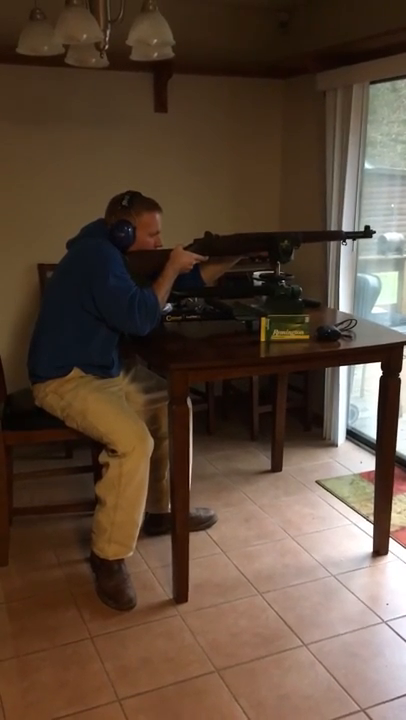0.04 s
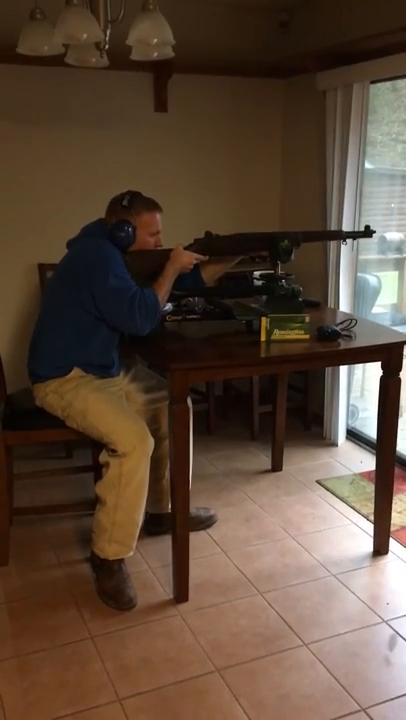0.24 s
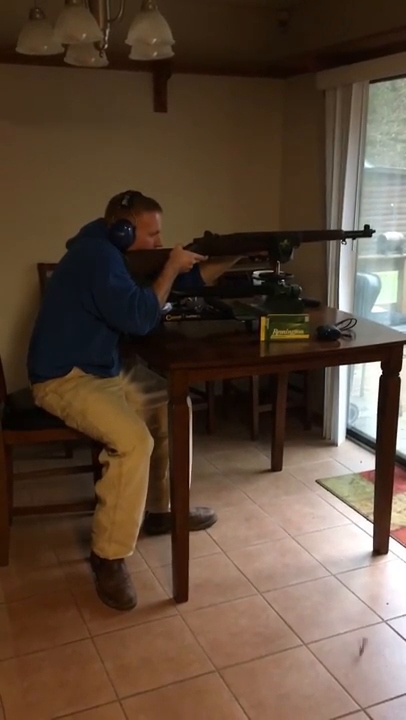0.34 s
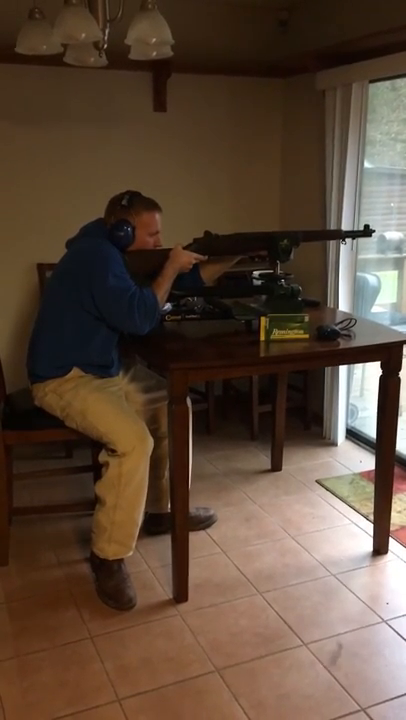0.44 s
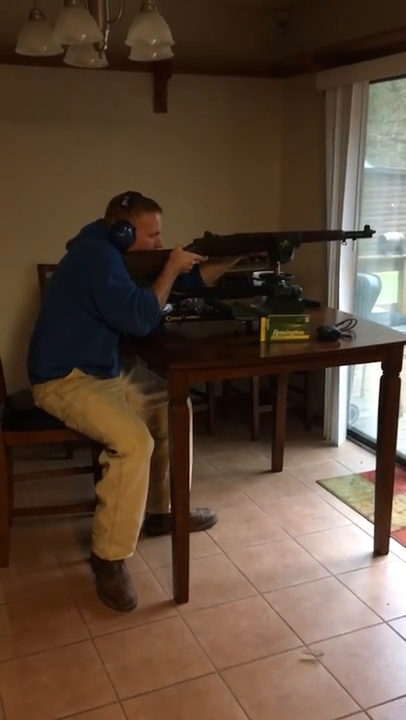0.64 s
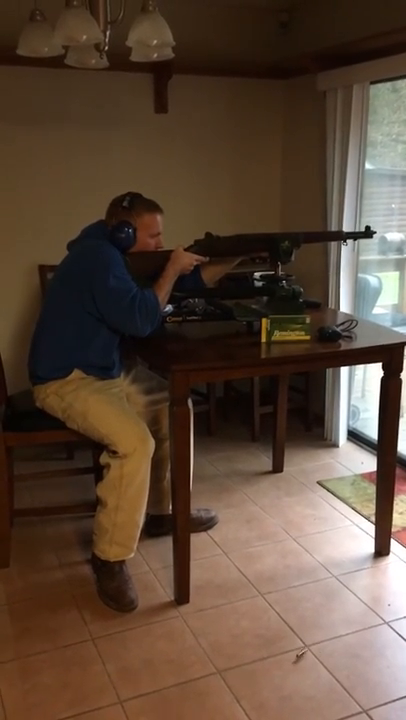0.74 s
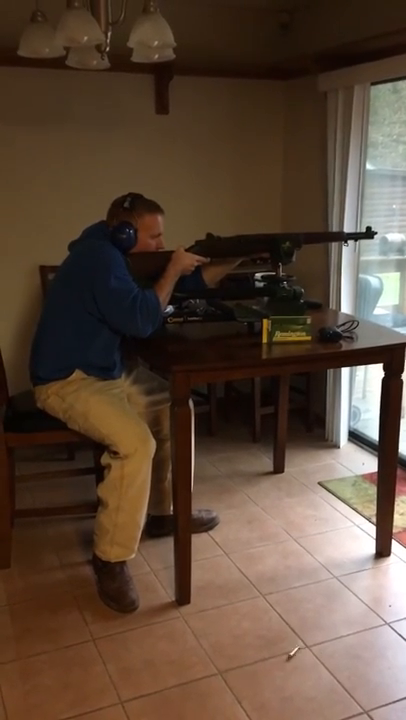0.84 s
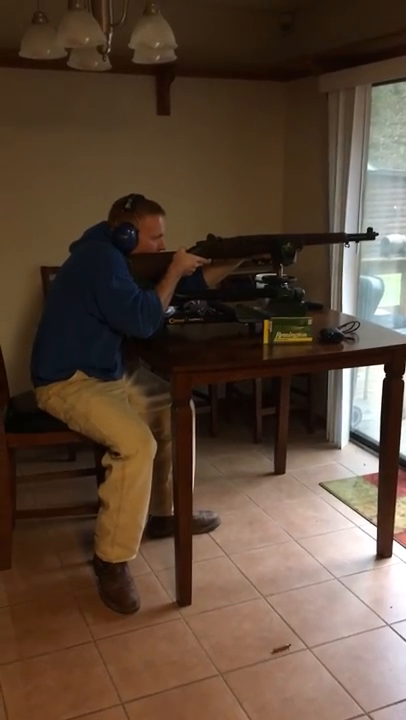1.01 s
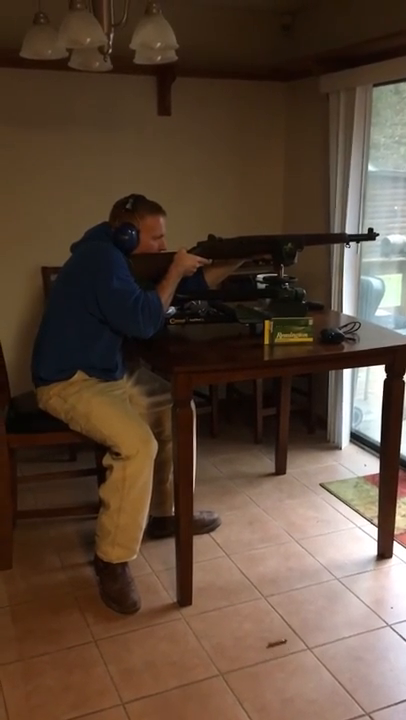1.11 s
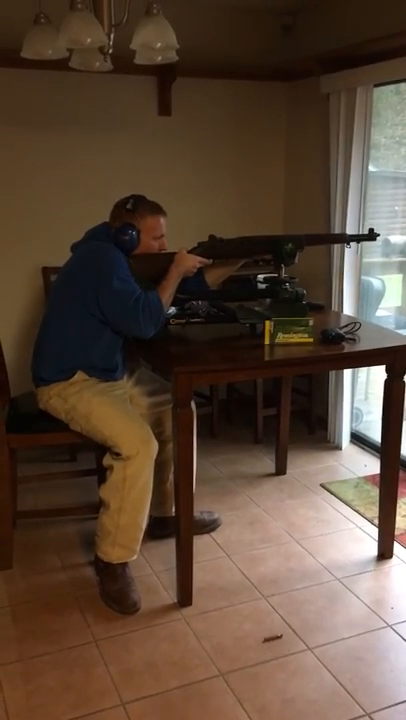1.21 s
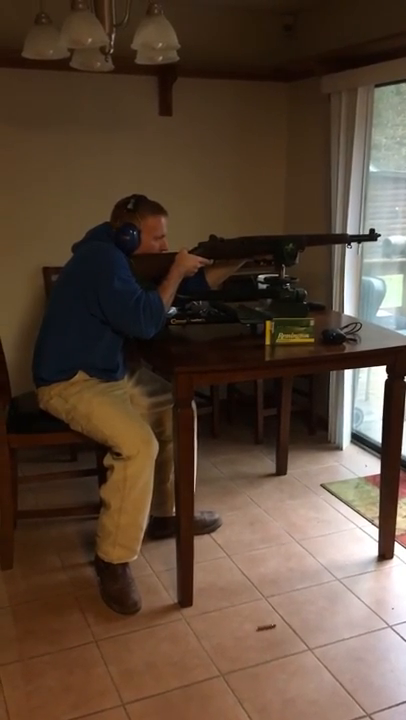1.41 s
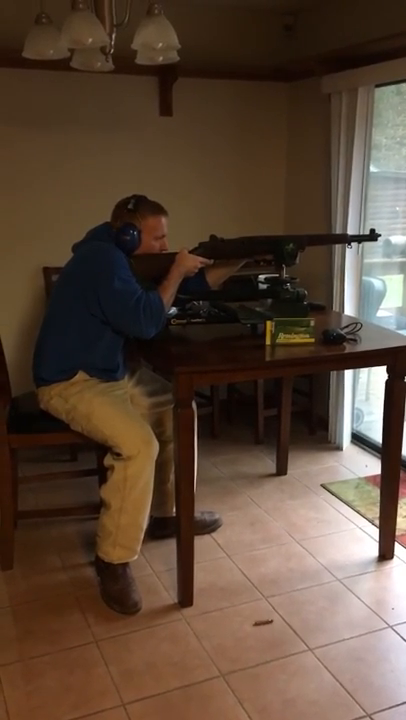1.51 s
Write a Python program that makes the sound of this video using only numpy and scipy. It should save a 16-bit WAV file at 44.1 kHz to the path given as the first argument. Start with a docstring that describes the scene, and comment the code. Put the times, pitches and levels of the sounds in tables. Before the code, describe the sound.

An empty brass shell casing drops on tile, clinking, bouncing and rattling to rest indoors.

```python
"""Cartridge case dropped on tile

A spent brass case lands on a tile floor, tumbles through ever shorter bounces, rattles and rolls.
Each contact gives a dull knock, a bright tick and a high, beating ring of the case's thin wall.
A hard-walled dining room answers, over low background noise, hum and a few soft bumps."""
import sys
import numpy as np
from scipy import signal
from scipy.fft import rfft, irfft, next_fast_len
from scipy.io import wavfile

SR = 44100
rng = np.random.default_rng(int(sys.argv[2]) if len(sys.argv) > 2 else 0)


def wrap_up_sound(samples):
    """Save the sound to the file named by the first command line argument, as 16-bit audio."""
    columns = np.atleast_2d(samples).T
    # keep every value between -1 and 1, then stretch to whole-number steps
    tamed = np.clip(columns, -1, 1)
    steps = np.round(tamed * 32767).astype(np.int16)
    wavfile.write(sys.argv[1], SR, steps)


N = 68355
TOP_HZ = 16000

# Contacts with the tile. Each row: start in seconds, knock in dB, knock cutoff in Hz, tick in dB,
# room send in dB, ring in dB, ring T60 in seconds, spin flutter 0-1, lowest mode's extra gain in dB.
CONTACTS = [(0.2023, 1.5, 4500, -2.5, 5.5, -9, 0.27, 0.71, 7.5),
            (0.3658, -14, 2600, -28, 9, -27, 0.64, 0.23, 3.5),
            (0.4656, -13.5, 2940, -28, 7.5, -29, 0.42, 0.38, 5),
            (0.5506, -24.5, 4430, -34, 14.5, -34.5, 0.21, 0.5, -1),
            (0.568, -9.5, 3500, -18, 7, -59, 0.16, 0.2, 2), (.5766, -27, 3020, -10.5, 0, -19, 0.57, 0, -4),
            (0.6987, -12, 2950, -11, 6, -16, 0.31, .2, -13),
            (0.7506, -10.5, 3800, -41, 0.5, -19.5, 0.28, 0.3, -16),
            (0.7899, -16, 3500, -15, 7, -22.5, 0.4, 0.42, -2),
            (0.8334, -10.5, 3800, -40, 0.5, -57, .2, 0.42, 3),
            (0.8516, -15, 3500, -17.5, 6, -15.5, 0.4, 0.31, -17),
            (0.901, -13.5, 3500, -18.5, 6, -30.5, 1.05, 0.3, 3),
            (0.9466, -12, 3000, -17, 1.5, -34, 0.47, 0.2, -1),
            (0.971, -18.5, 3500, -20.5, 9, -43, 2.15, 0.36, 6)]


def bounces():
    """The case strikes the floor with one end, then the other."""
    out = ring()
    for start_s, knock_db, top_hz, tick_db, room_db, *_ in CONTACTS:
        add(out, start_s, contact(knock_db, top_hz, tick_db, room_db))
    return out


def ring(attack_s=0.00013, flutter_hz=59.18, flutter_rad=0.7, shimmer_db=2.5, wander_rad=1.0):
    """Contacts feed the wall's modes, which beat together and flutter as the spinning case beams them."""
    # Wall mode frequencies in Hz, lowest first.
    modes_hz = [7760, 9643, 9670, 9827, 13935]
    # Each row, one per mode: level in dB, factors on the contact's T60, ring dB and flutter.
    modes = [(-22, 1.22, 1.5, 1.9), (-11.5, 1.09, 1.0, 1.6), (-21, 1.97, 1.0, 1.0), (0, 1.02, 1.0, 1.27),
             (-30.5, 1.16, 0.61, 2.6)]
    t = np.arange(N) / SR
    start_s, *_, ring_db, t60_s, flutter, low_db = np.transpose(CONTACTS)
    age_s = np.maximum(t - start_s[:, None], 0)
    attack = 1 - np.exp(-age_s / attack_s)
    last_contact = np.maximum(np.searchsorted(start_s, t) - 1, 0)
    depth = np.clip(flutter, 0, 1)[last_contact]
    out = np.zeros(N)
    for hz, (db, t60_scale, db_scale, flutter_scale) in zip(modes_hz, modes):
        start_db = db + db_scale * ring_db + low_db * (hz == modes_hz[0])
        decays = amp(start_db[:, None] - 60 * age_s / (t60_scale * t60_s[:, None]))
        envelope = np.linalg.norm(decays * attack, axis=0)  # contacts add in power
        spin = 1 + depth * np.tanh(flutter_scale * wobble(2 * flutter_hz))
        shimmer = amp(shimmer_db * wobble(rate_hz=44.63))  # room's standing waves
        phase = 2 * np.pi * (hz * t + rng.uniform())
        phase += flutter_rad * flutter_scale * depth * wobble(2 * flutter_hz)
        phase += wander_rad * wobble(rate_hz=35)  # case moves through the room's echoes
        out += envelope * unit(spin * shimmer) * np.sin(phase)
    return out


def contact(knock_db, top_hz, tick_db, room_db):
    """One touch of brass on tile: knock, tick and their reflections."""
    # Knock spectrum. Each row: frequency in Hz, level in dB.
    knock_spectrum = [(100, -27.5), (320, -3), (480, -16), (750, -15.5), (1150, -1.5), (2000, 1), (2900, 1),
                      (4000, -1), (8000, -11), (15000, -4.5)]
    # Early reflections, the first from the ceiling. Each row: delay in seconds, level in dB relative to the
    # room send.
    reflections = [(.0039, -18.5), (0.0118, -21)]
    click = amp(knock_db) * pulse(knock_spectrum, top_hz) + amp(tick_db) * tick()
    out = amp(room_db) * room(click)
    add(out, 0, click)
    for delay_s, db in reflections:
        add(out, delay_s, amp(db + room_db) * click)
    return out


def tick(scrape_s=0.0008, size=2048):
    """The rim's brief bright scrape: a smeared click of energy 1."""
    # Tick spectrum. Each row: frequency in Hz, level in dB.
    spectrum = [(100, -34.5), (600, 2.5), (1000, 1), (1400, -2.5), (3000, -3.5), (4600, 7), (6500, 4.5),
                (9300, 3.5), (11000, -16.5), (14000, -2), (15600, -33)]
    smear = rfft(rng.standard_normal(size) * np.exp(-np.arange(size) / SR / scrape_s))
    allpass = smear / np.abs(smear)
    click = irfft(rfft(pulse(spectrum, TOP_HZ), size) * allpass)[:size // 2]
    return click / np.linalg.norm(click)


def pulse(spectrum, top_hz, lag_at_1khz_s=0.001244, size=1024, order=6):
    """Impact of energy 1; the tile's bending waves carry highs faster than lows."""
    hz = np.fft.rfftfreq(size, 1 / SR)
    magnitude = amp(along(spectrum, hz)) / np.sqrt(1 + (hz / top_hz) ** (2 * order))
    cepstrum = irfft(np.log(magnitude))
    cepstrum[1:size // 2] *= 2  # fold to minimum phase
    cepstrum[size // 2 + 1:] = 0
    dispersion = np.exp(-4j * np.pi * lag_at_1khz_s * np.sqrt(hz * 1000))
    click = irfft(np.exp(rfft(cepstrum)) * dispersion)
    return click / np.linalg.norm(click)


def rattle(count=20, rate_hz=47, scatter_db=1.5):
    """Quick small touches fade as the case lies down."""
    # Rattle strength. Each row: time in seconds, knock level in dB.
    strength = [(.96, -18.5), (1.0, -21.5), (1.06, -24.5), (1.152, -28), (1.3, -29.5), (1.55, -63)]
    times_s, levels_db = np.transpose(strength)
    out = np.zeros(N)
    for k in range(count):
        start_s = times_s[0] + (k + rng.uniform()) / rate_hz
        db = np.interp(start_s, times_s, levels_db) - scatter_db * rng.standard_normal()
        add(out, start_s, contact(db, top_hz=3500, tick_db=db - 9, room_db=7.5))
    return out


def roll(centre_hz=7830, width_hz=20):
    """Rolling keeps the lowest mode singing faintly and unevenly."""
    # Roll envelope. Each row: time in seconds, level in dB.
    envelope = [(.88, -60), (.97, -70), (1.04, -64), (1.11, -46.5), (1.19, -67), (1.26, -52),
                (1.378, -66.5), (1.53, -53.5)]
    t = np.arange(N) / SR
    times_s, levels_db = np.transpose(envelope)
    song = filtered(rng.standard_normal(N), lambda hz: 1 / (1 + ((hz - centre_hz) / width_hz) ** 2))
    return amp(np.interp(t, times_s, levels_db)) * (t > times_s[0]) * unit(song)


def room(x, gap_s=0.0015, build_s=0.0017):
    """Diffuse reverberation, new for each place where the case lands."""
    # Room decay. Each row: frequency in Hz, T60 in seconds.
    decay = [(150, 0.6), (1000, 0.53), (3000, 0.31), (8000, 0.4), (15000, 0.75)]
    hz, t, bins = signal.stft(rng.standard_normal(SR // 2), SR, nperseg=256)
    bins *= amp(-60 * t / along(decay, hz)[:, None])
    tail = signal.istft(bins, SR, nperseg=256)[1]
    tail *= np.clip((np.arange(len(tail)) / SR - gap_s) / build_s, 0, 1)
    return signal.fftconvolve(x, tail / np.linalg.norm(tail))


def bumps(width_cycles=1.2):
    """Soft low bumps somewhere in the room."""
    # Each row: centre time in seconds, frequency in Hz, level in dB.
    events = [(.16, 185, -46), (.86, 48, -49), (1.29, 55, -48)]
    t = np.arange(N) / SR
    out = np.zeros(N)
    for centre_s, hz, db in events:
        envelope = amp(db) * np.exp(-((t - centre_s) * hz / width_cycles) ** 2)
        out += envelope * np.sin(2 * np.pi * (hz * t + rng.uniform()))
    return out


def background(steady_db=-50.5, waver_rad=0.32):
    """Steady room noise, with a low rumble and a wavering hum that slowly grow."""
    # Noise spectra. Each row: frequency in Hz, relative density in dB.
    steady_spectrum = [(20, -24), (45, -28), (180, -6.5), (450, -19.5), (900, -1), (2000, 1.5), (3400, -3),
                       (6000, -11), (10000, -21), (16000, -32)]
    rumble_spectrum = [(25, -11), (50, -0.5), (75, -2), (180, 1.5), (260, -0.5), (360, -6.5), (500, -4),
                       (1000, -7.5), (4000, -78.5)]
    # Rumble envelope. Each row: time in seconds, level in dB.
    envelope = [(0, -53), (.25, -48.5), (.8, -49.5), (1.1, -49), (1.35, -47), (1.55, -47)]
    # Hum tones. Each row: frequency in Hz, rms level in dB at the rumble's loudest.
    tones = [(179, -59.5), (361, -57.5)]
    t = np.arange(N) / SR
    times_s, levels_db = np.transpose(envelope)
    rumble_db = np.interp(t, times_s, levels_db)
    hum = np.zeros(N)
    for hz, db in tones:
        hum += amp(db) * np.sqrt(2) * np.sin(2 * np.pi * hz * t + waver_rad * wobble(rate_hz=10))
    steady = amp(steady_db) * noise(steady_spectrum)
    rumble = amp(rumble_db) * noise(rumble_spectrum)
    return steady + rumble + amp(rumble_db - levels_db.max()) * hum


def amp(db):
    """Decibels to gain."""
    return 10 ** (np.asarray(db) / 20)


def unit(x):
    """Scale to rms 1."""
    return x / np.sqrt(np.mean(x ** 2) + 1e-20)


def along(points, hz):
    """Interpolate (Hz, value) points on a log frequency axis."""
    points_hz, values = np.transpose(points)
    return np.interp(np.log(hz + 1), np.log(points_hz + 1), values)


def wobble(rate_hz):
    """Smooth random curve, rate_hz knots a second."""
    fine = signal.resample(rng.standard_normal(512), 512 * 8)
    return np.interp(np.arange(N) * rate_hz / SR, np.arange(len(fine)) / 8, fine)


def filtered(x, response):
    """Apply a gain given as a function of Hz."""
    size = next_fast_len(N + SR // 2)
    return irfft(rfft(x, size) * response(np.fft.rfftfreq(size, 1 / SR)), size)[:N]


def noise(spectrum):
    """Coloured noise of rms 1."""
    return unit(filtered(rng.standard_normal(N), lambda hz: amp(along(spectrum, hz))))


def add(track, start_s, sound):
    """Mix a sound into the track in place."""
    part = track[max(round(start_s * SR), 0):][:len(sound)]
    part += sound[:len(part)]


def scene():
    """The case and the room, mono."""
    return (bounces() + rattle() + roll() + background() + bumps())[None]


def record(dry):
    """Brick-wall low-pass at TOP_HZ."""
    return filtered(dry[0], lambda hz: hz < TOP_HZ)[None]


dry = scene()
out = record(dry)
wrap_up_sound(out)
```